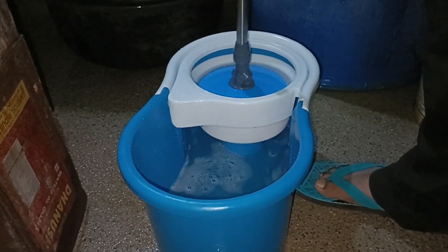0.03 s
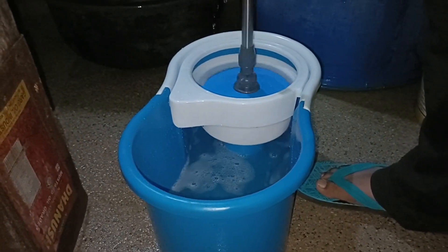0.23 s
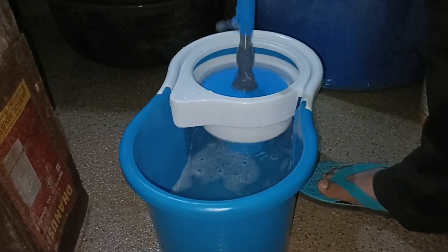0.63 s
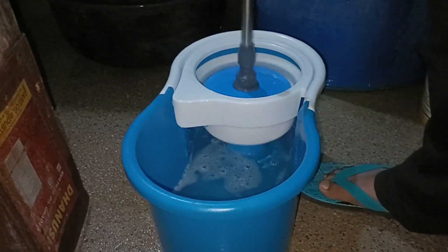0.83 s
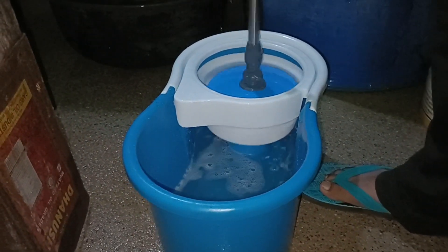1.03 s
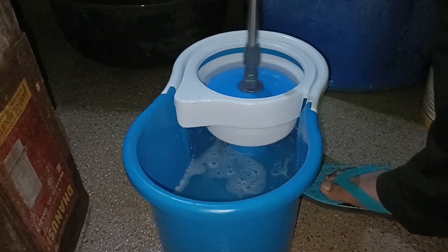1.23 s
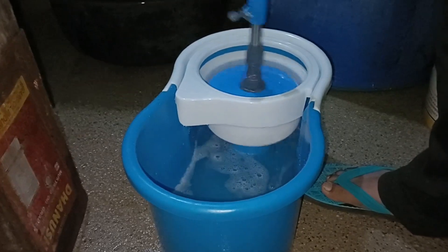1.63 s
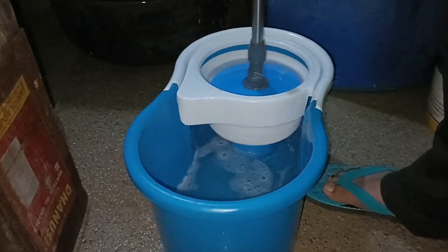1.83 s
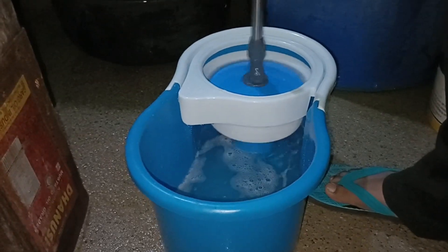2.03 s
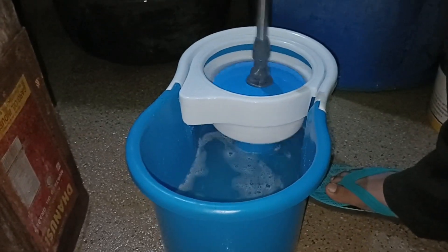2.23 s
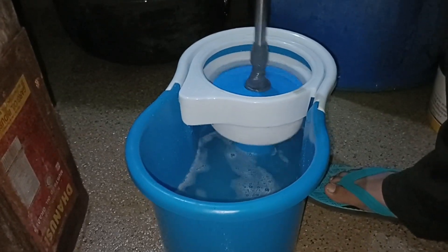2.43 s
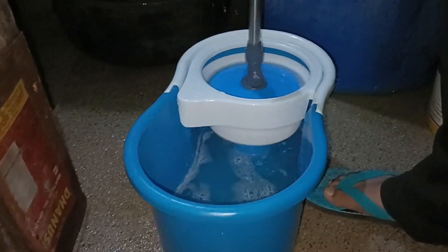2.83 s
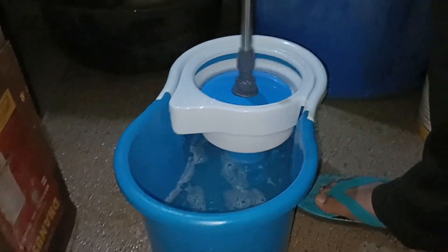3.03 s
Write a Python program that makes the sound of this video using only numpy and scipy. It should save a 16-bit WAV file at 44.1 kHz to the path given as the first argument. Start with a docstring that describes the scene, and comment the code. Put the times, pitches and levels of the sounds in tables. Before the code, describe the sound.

A wet mop is spun dry with three pushes, each bringing ratchet-like clacks and a throbbing whirr of spray. The wobbling basket rubs and bumps the plastic bucket into short hollow booms, heard up close in a small, quiet room.

```python
"""A plastic bucket hums faintly and its basket rubs, then three pushes on a pole spin a wet mop dry.
On each push the spiral drive in the metal pole clacks and scrapes, and the wobbling basket whirrs
and rubs its seat. Flung water spatters on the bucket wall, and the lopsided load bumps it into short
booms. The mop thumps down and the bucket shudders on the floor of a small, quiet room."""
import sys
import numpy as np
from scipy import signal
from scipy.fft import rfft, irfft
from scipy.io import wavfile
from scipy.ndimage import uniform_filter1d

SR = 44100
rng = np.random.default_rng(int(sys.argv[2]) if len(sys.argv) > 2 else 0)


def log_audio(samples):
    """Write samples as a 16-bit WAV file to the path given in sys.argv[1]."""
    # one column per channel
    frames = np.atleast_2d(samples).T
    # limit to full scale, then quantise
    limited = np.clip(frames, -1, 1)
    pcm = np.round(limited * 32767).astype(np.int16)
    wavfile.write(sys.argv[1], SR, pcm)


N = 141120

# How the steady sounds swell and sink, before each one's own gain: t/s, level/dB
DRONE_LEVELS = [(0,-45.5),(.2,-45.5),(.38,-22),(.53,-38),(1.05,-42),(1.48,-33.5),(1.9,-44.5),(2.24,-42.5),(2.55,-25.5),(2.8,-34),(3.2,-51.5)]  # the bucket wall drones
SHUDDER_LEVELS = [(0,-42),(.2,-41.5),(.35,-22.5),(.6,-37.5),(.85,-44),(1.05,-37),(1.33,-50),(1.45,-30.5),(1.67,-45),(1.8,-43),(1.91,-41),(2.02,-28.5),(2.16,-41),(2.38,-40.5),(2.44,-22),(2.66,-34),(2.78,-23),(2.95,-35.5),(3.2,-45.5)]  # the bucket shudders on the floor
RATTLE_LEVELS = [(0,-44.5),(.2,-42.5),(.29,-23.5),(.43,-38),(.7,-39),(.9,-50.5),(1.03,-41.5),(1.17,-40),(1.29,-30),(1.5,-34),(1.75,-48),(2.25,-39),(2.43,-28.5),(2.53,-41),(2.75,-41.5),(3.2,-52)]  # the drive rattles in the pole
WHIRR_LEVELS = [(0,-50),(.17,-51),(.32,-30.5),(.56,-28.5),(.72,-35),(.91,-45),(1.08,-40.5),(1.17,-44),(1.27,-37),(1.38,-34.5),(1.47,-25.5),(1.74,-35.5),(1.94,-44.5),(2.09,-43),(2.24,-46.5),(2.36,-32.5),(2.56,-29),(2.78,-29.5),(3.0,-43.5),(3.2,-48.5)]  # the basket and its spray whirr

# When the short sounds come and how strong they are: t/s, level/dB
WATER_GUSHES = [(.080,-43.5),(.122,-42.5),(.683,-37),(.788,-31.5),(.94,-42),(1.043,-38.5),(1.402,-32),(1.437,-30.5),(1.71,-40),(1.565,-35),(1.80,-37),(1.979,-35.5),(2.162,-49),(2.912,-36.5)]  # water hits the wall
SEAT_RUBS = [(0.121,-31.5),(.193,-34),(.25,-31),(0.526,-33),(1.145,-36),(1.215,-34.5),(1.278,-33.5),(1.334,-33),(1.47,-30),(1.633,-33.5),(1.71,-35.5),(1.982,-42),(2.195,-31.5),(2.277,-33),(2.294,-32),(2.649,-35),(2.743,-31)]  # the basket rubs the seat it spins on
DRIVE_CLACKS = [(.247,-18.5),(.303,-12.5),(.340,-13.5),(.380,-15.5),(.525,-21.5),(1.224,-22),(1.273,-18.5),(1.357,-23.5),(1.401,-20.5),(2.002,-29),(2.412,-22),(2.4395,-13),(2.460,-19.5)]  # the drive catches
SPIRAL_SCRAPES = [(.28,-40),(.463,-34),(.527,-29.5),(.606,-36),(.678,-35.5),(.963,-43),(1.04,-32),(1.33,-42),(1.41,-32),(1.472,-30.5),(1.55,-31),(2.06,-37),(2.098,-41.5),(2.17,-36.5),(2.35,-33.5),(2.392,-31.5),(2.582,-30),(2.652,-33),(2.735,-32.5),(2.826,-38.5)]  # the spiral scrapes
MOP_THUMPS = [(.335,-15.5),(1.768,-30),(1.809,-32.5),(2.012,-29.5),(2.422,-30),(2.558,-22.5),(2.768,-21)]  # the mop drops in the basket
# The lopsided load bumps the wall: t/s, level/dB, f/Hz
WALL_BOOMS = [(0.242,-32.5,305.9),(.352,-23,311.8),(.382,-20.5,289),(0.411,-28.5,302.4),(.451,-24,273),(0.63,-28.5,319.6),(1.069,-34,291.1),(1.276,-24.5,303.5),(1.305,-30,294.5),(1.339,-31,281),(1.422,-34,272),(1.509,-39,311),(1.762,-33.5,312),(2.265,-31.5,300.2),(2.407,-26.5,290.7),(2.466,-21.5,287),(2.502,-25.5,290.8),(2.535,-26.5,309.4),(2.575,-23.5,293.6),(2.679,-23,311),(2.732,-24.5,298.4),(2.849,-27.5,307.5),(2.981,-33.5,314)]

# Modes (natural ringing tones) of the bucket: f/Hz, level/dB, t60/s (time to fade by 60 dB)
WALL_MODES = [(272.6,-0.5,0.18),(288.6,1.5,0.3),(304.7,2,0.16),(336.6,-2,0.57),(645.9,-3.5,0.17),(754,-4,0.13),(814,-10.5,0.12),(899,-13,0.11)]
BASE_MODES = [(67,-7,0.96),(97.6,-0.5,0.21),(116.9,2.5,0.21),(159,-2,0.1),(205,0,0.025)]
# Modes of the basket's seat: f/Hz, level/dB
SEAT_MODES = [(650,-14),(810,-5.5),(980,-11.5),(1425,-5.5),(1800,-14),(2060,-10.5),(2380,-16),(2920,-15)]

# Tone colour, or how strong each pitch is next to the others: f/Hz, level/dB
POLE_TONE = [(200,-30),(500,-2.5),(1000,1),(3000,-6),(5000,5.5),(6200,2.5),(6550,8.5),(7230,5),(8000,0.5),(9500,-2),(11500,3),(14000,0),(16000,-9)]
SPRAY_TONE = [(150,-31),(420,-2),(490,11.5),(680,7),(950,4),(1180,0.5),(1420,9.5),(1620,7),(1900,1.5),(2080,6.5),(2700,5.5),(3200,-1),(3900,4.5),(4500,1.5),(5200,3.5),(5900,-10),(7000,-10.5),(8500,-12.5),(13000,-8),(16000,-15)]
GUSH_TONE = [(200,-24),(700,-10),(1500,-2.5),(2700,5),(3200,0.5),(4000,6.5),(5200,6.5),(6000,-3.5),(8500,-16),(16000,-25)]
# Stereo width, the side (left-right difference) against the mid (what both share): f/Hz, level/dB
STEREO_WIDTH = [(200,-82),(500,-13),(1000,3.5),(2000,-0.5),(16000,0.5)]

DROPS_PER_S, SLIPS_PER_S = 2200, 3000  # tiny impacts at each spot: water, metal


def from_db(db):
    """Turn decibels into a gain."""
    return 10 ** (np.asarray(db) / 20)


def unit_power(x):
    """Scale to an average power of one."""
    return x / np.sqrt(np.mean(x ** 2) + 1e-20)


def level(rows):
    """Gain over time from (t/s, level/dB) points."""
    return from_db(np.interp(np.arange(N) / SR, *np.transpose(rows)))


def gains(points):
    """Gain at every frequency from (f/Hz, level/dB) points."""
    hz, db = np.transpose(points)
    all_hz = np.arange(N + 1) * SR / (2 * N)
    return from_db(np.interp(np.log(all_hz + 1), np.log(hz), db))


def tint(x, gain):
    """Filter with a gain for every frequency."""
    return irfft(rfft(x, 2 * N) * gain)[..., :N]


def band(x, low_hz, high_hz):
    """Gently cut what lies outside two frequencies."""
    return signal.sosfilt(signal.butter(2, [low_hz, high_hz], "band", fs=SR, output="sos"), x)


def stereo(mid, side, pan_db=0):
    """Make left and right from mid and side; a positive pan leans left."""
    return np.array([mid + side, mid - side]) * from_db([[pan_db / 2], [-pan_db / 2]])


def ring(force, modes):
    """A force sets modes ringing and fading; their levels set their energy."""
    out = 0
    for hz, db, t60 in modes:
        decay, angle = from_db(-60 / (t60 * SR)), 2 * np.pi * hz / SR
        tone = signal.lfilter([1, 0, -1], [1, -2 * decay * np.cos(angle), decay * decay], force + 1e-18)
        out = out + from_db(db) / np.sqrt(t60) * tone
    return out


def shaken(modes):
    """Random jolts keep modes ringing, held near a power of one."""
    ringing = ring(rng.standard_normal(N), modes)
    return ringing / np.sqrt(uniform_filter1d(ringing ** 2, int(.04 * SR)) + 1e-12)


def swells(rows, rise_s, fade_s):
    """Gain over time of contacts that build up to their moment and die away."""
    power = np.zeros(N)
    for s, db in rows:
        near = np.arange(max(int(s * SR) - SR // 10, 0), min(int(s * SR) + SR // 2, N))
        t = near / SR - s
        falloff = np.minimum(np.maximum(-t / rise_s, t / fade_s), 20)
        power[near] += (from_db(db) * np.exp(-falloff)) ** 2
    return np.sqrt(power)


def radiate(force, colour, pan_db=0, tub_t60_s=0.037, room_t60_s=0.066):
    """A sound takes its source's colour and arrives directly and as echoes off the tub and room."""
    t = np.arange(N) / SR
    tub = rng.standard_normal((2, N)) * from_db(-60 * t / tub_t60_s)
    room = rng.standard_normal((2, N)) * from_db(-60 * t / room_t60_s) * (1 - np.exp(-t / tub_t60_s))
    paths = unit_power(tub) + from_db(-3.5) * unit_power(room)
    paths[0, 0] += from_db(-0.5) * np.sqrt(N)  # the direct sound, in the mid only
    paths = np.array([unit_power(p) for p in paths]) / np.sqrt(N)
    source = tint(force, unit_power(gains(colour)))
    mid, side = tint(source, rfft(paths, 2 * N))
    return stereo(mid, tint(side, gains(STEREO_WIDTH)), pan_db)


def rustle(strength, per_s, colour, pan_db=0, spots=2, spread_db=4):
    """Tiny random impacts of uneven size; each spot has its own paths to the listener."""
    out = 0
    for _ in range(spots):
        size = from_db(spread_db * np.minimum(rng.exponential(1, N), 4))
        impacts = size * rng.choice([-1, 1], N) * (rng.random(N) < per_s / SR)
        out = out + radiate(strength * unit_power(impacts), colour, pan_db)
    return out / np.sqrt(spots)


def wall_drone():
    """The spin shakes the bucket wall, which hums at its own pitches."""
    hum = stereo(shaken(WALL_MODES), from_db(-8.5) * shaken(WALL_MODES))
    return band(from_db(-2) * level(DRONE_LEVELS) * hum, 200, 1020)


def floor_shudder():
    """The bucket's base shudders on the floor with a low rumble."""
    rumble = stereo(shaken(BASE_MODES), from_db(-23.5) * shaken(BASE_MODES))
    return band(from_db(-9) * level(SHUDDER_LEVELS) * rumble, 44, 252)


def pole_drive():
    """The spiral drive rattles, scrapes and clacks inside the metal tube."""
    rattle = from_db(-8) * level(RATTLE_LEVELS)
    scrapes = swells(SPIRAL_SCRAPES, rise_s=0.0091, fade_s=0.015)
    friction = rustle(np.hypot(rattle, scrapes), SLIPS_PER_S, POLE_TONE)
    clacks = from_db(-0.5) * swells(DRIVE_CLACKS, rise_s=0.0001, fade_s=0.0025) * rng.standard_normal(N)
    return friction + radiate(clacks, POLE_TONE)


def basket_whirr(typical_turns_per_s=9.9, wobble_db=1.5):
    """Spray and bearing noise throb once a turn, faster when the whirr is louder."""
    loudness = level(WHIRR_LEVELS)
    turns = np.cumsum(typical_turns_per_s * unit_power(loudness ** 0.14)) / SR
    throb = loudness * from_db(-4.5 + wobble_db * np.sin(2 * np.pi * turns))
    spray = rustle(throb, DROPS_PER_S, SPRAY_TONE, pan_db=-1.5)
    return spray + throb * from_db(-1.5) * big_drops()


def big_drops(per_s=950, t60_s=0.04, low_hz=500, high_hz=13000):
    """Larger drops in the spray ring briefly, each at its own pitch and place."""
    t = np.arange(int(2 * t60_s * SR)) / SR
    out = np.zeros((2, N + len(t)))
    for when, pitch, place in rng.random((int(per_s * N / SR), 3)):
        start = int(when * N)
        hz = low_hz + (high_hz - low_hz) * pitch ** 2
        drop = np.sqrt(pitch) * np.sin(2 * np.pi * hz * t) * from_db(-60 * t / t60_s)
        out[:, start:start + len(t)] += np.outer([np.cos(np.pi * place), np.sin(np.pi * place)], drop)
    return unit_power(tint(out, gains(SPRAY_TONE)))


def water_gushes():
    """Flung water hits the wall in sudden bursts of drops, off to the right."""
    bursts = swells(WATER_GUSHES, rise_s=0.0015, fade_s=0.022)
    return rustle(bursts, DROPS_PER_S, GUSH_TONE, pan_db=-9.5)


def seat_rubs(t60_s=0.06, blend_range_db=11):
    """Each rub of the wobbling basket makes its seat sing, with a new blend of modes every time."""
    out = 0
    for hz, mode_db in SEAT_MODES:
        blend = [(s, db + mode_db + blend_range_db * (rng.random() - .5)) for s, db in SEAT_RUBS]
        mode = [(hz, 0, t60_s)]
        tone = stereo(shaken(mode), shaken(mode), pan_db=2.5)
        out = out + swells(blend, rise_s=0.0093, fade_s=0.016) * tone
    return out


def wall_booms(waver_radians=0.66):
    """Each bump of the load raises a hollow boom whose pitch shifts as the wall flexes."""
    s, db, hz = np.transpose(WALL_BOOMS)
    phase = 2 * np.pi * np.cumsum(np.interp(np.arange(N) / SR, s, hz)) / SR
    waver = waver_radians * unit_power(band(rng.standard_normal(N), 4.8, 45))
    bumps = swells(zip(s, db), rise_s=0.012, fade_s=0.016)
    return np.sqrt(2) * bumps * np.sin(phase + waver)


def mop_thumps(contact_at_0db_s=0.00015):
    """The mop thumps down and the bucket's base rings; a harder thump has a shorter contact."""
    t = np.arange(N) / SR
    out = 0
    for s, db in MOP_THUMPS:
        contact_s = contact_at_0db_s / from_db(db / 2)
        age = np.maximum(t - s, 0) / contact_s
        blow = ring(age * np.exp(-np.minimum(age, 20)), BASE_MODES)
        out = out + from_db(db) * blow / np.abs(blow).max()
    return band(out, 44, 252)


def scene():
    """Mix the deep bucket with the pole, basket and water, which are too small to give bass."""
    bucket = wall_drone() + floor_shudder() + wall_booms() + mop_thumps()
    small_parts = pole_drive() + basket_whirr() + water_gushes() + seat_rubs()
    return bucket + band(small_parts, 62, 20000)


def record(dry):
    """Cut the treble steeply above 16000 Hz."""
    return signal.sosfilt(signal.ellip(10, .2, 80, 16000, fs=SR, output="sos"), dry)


dry = scene()
out = record(dry)
log_audio(out)
```